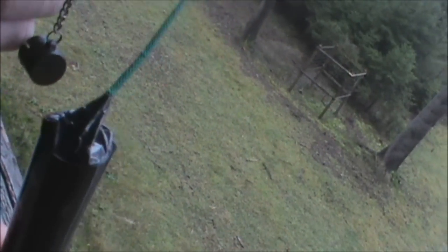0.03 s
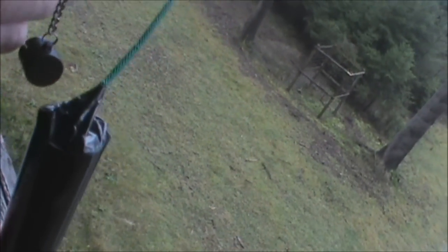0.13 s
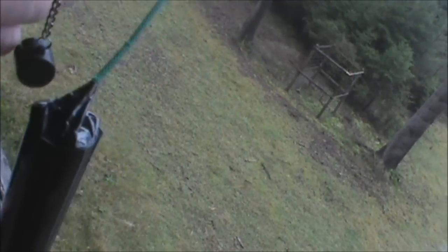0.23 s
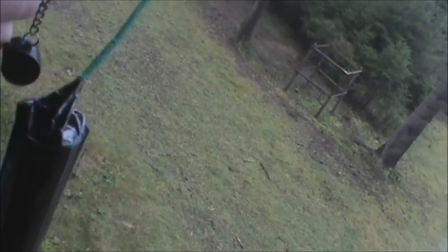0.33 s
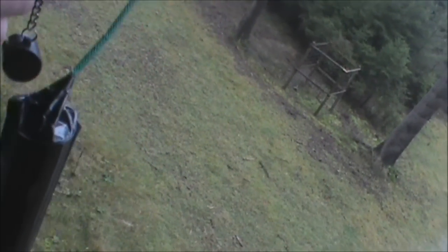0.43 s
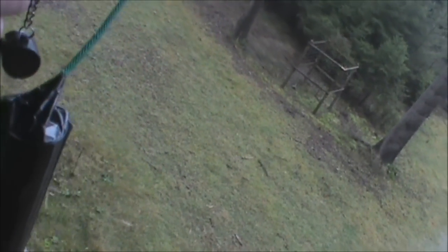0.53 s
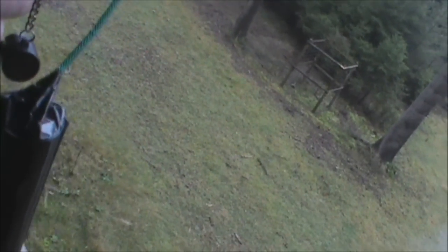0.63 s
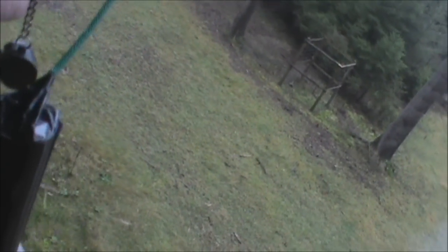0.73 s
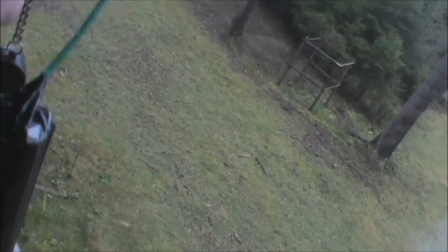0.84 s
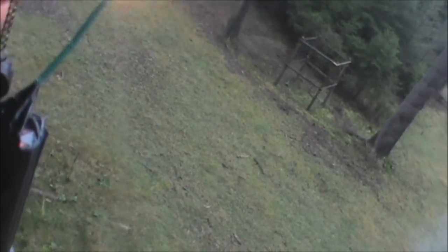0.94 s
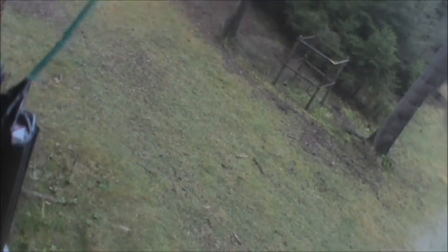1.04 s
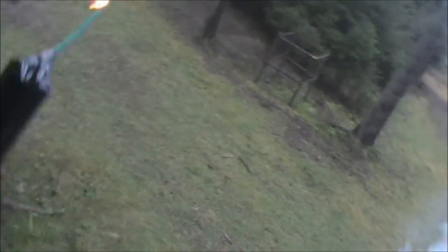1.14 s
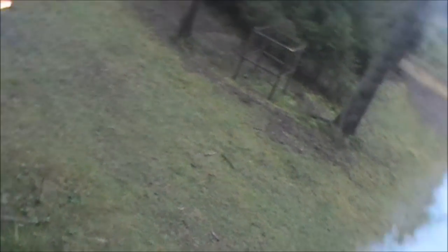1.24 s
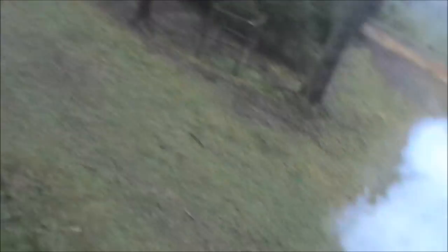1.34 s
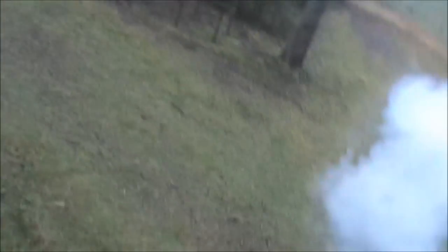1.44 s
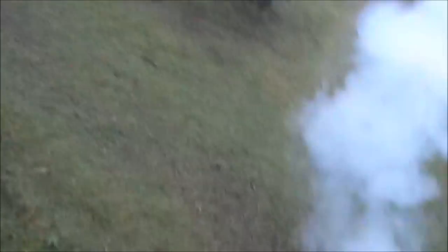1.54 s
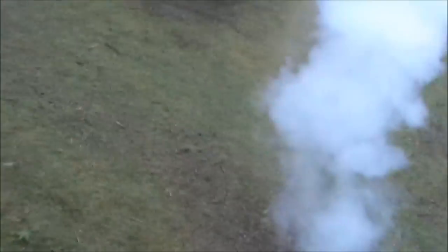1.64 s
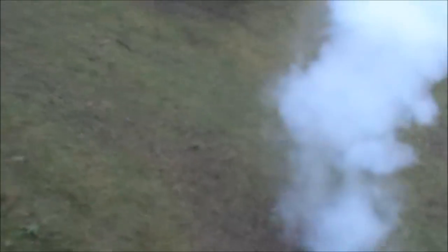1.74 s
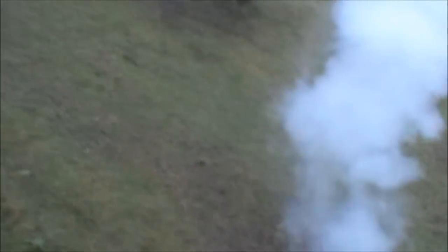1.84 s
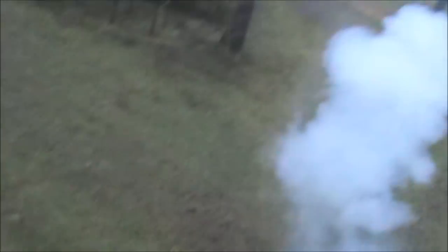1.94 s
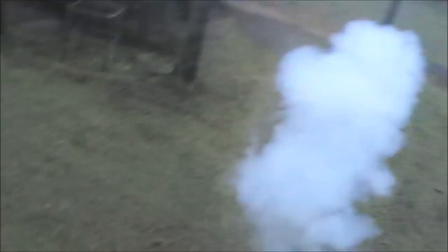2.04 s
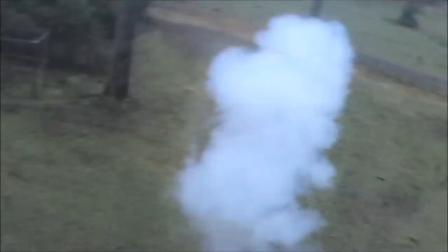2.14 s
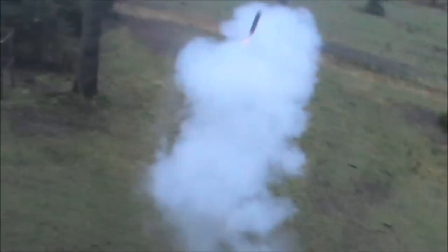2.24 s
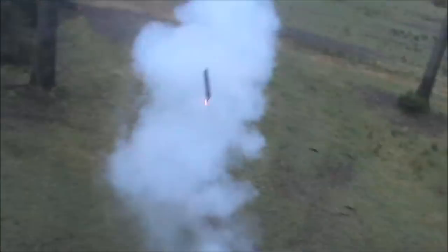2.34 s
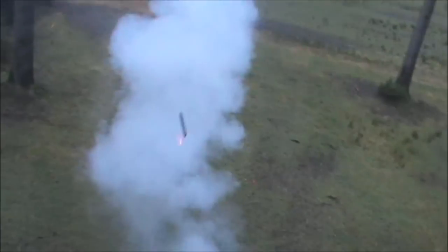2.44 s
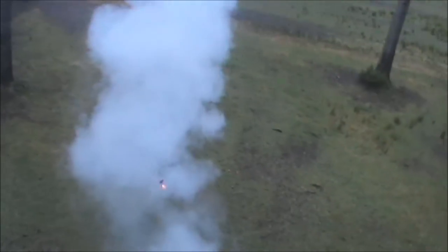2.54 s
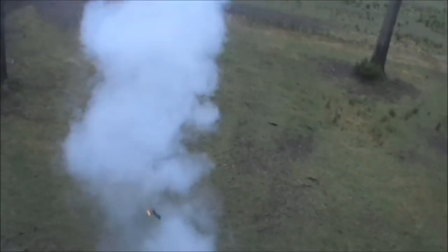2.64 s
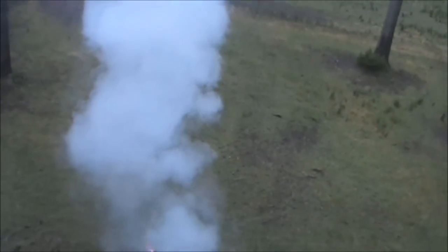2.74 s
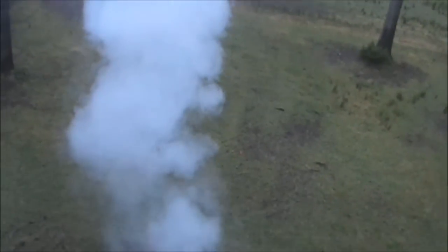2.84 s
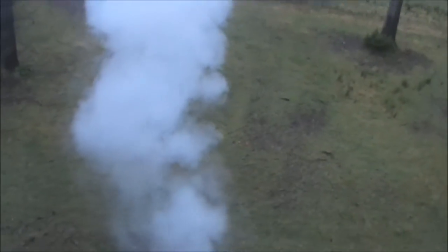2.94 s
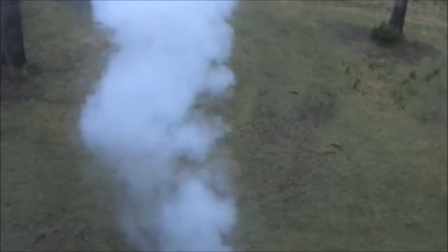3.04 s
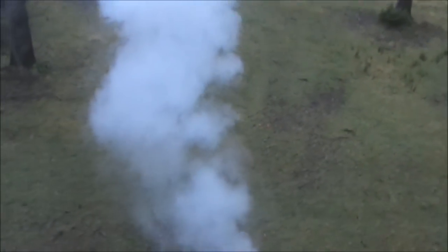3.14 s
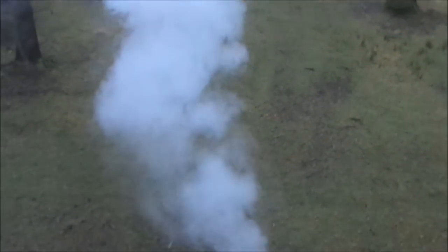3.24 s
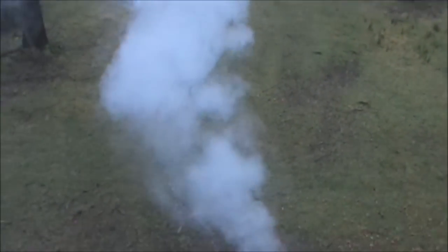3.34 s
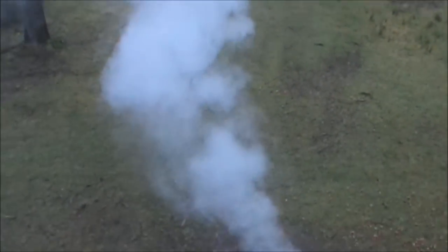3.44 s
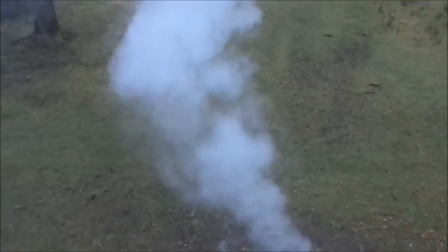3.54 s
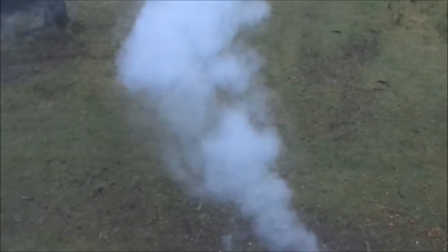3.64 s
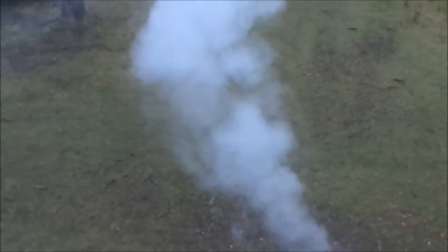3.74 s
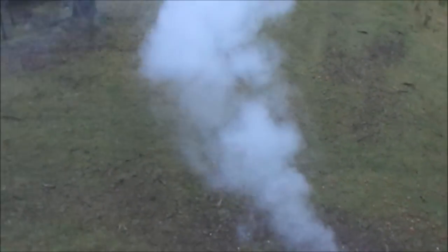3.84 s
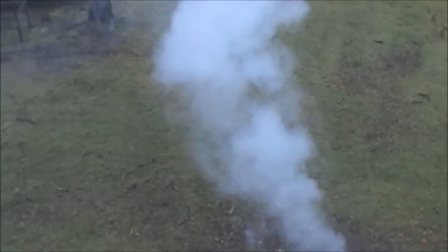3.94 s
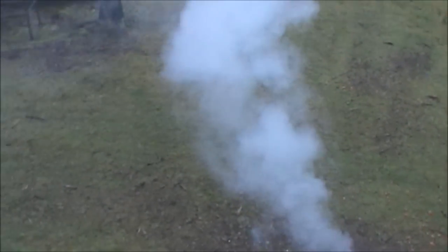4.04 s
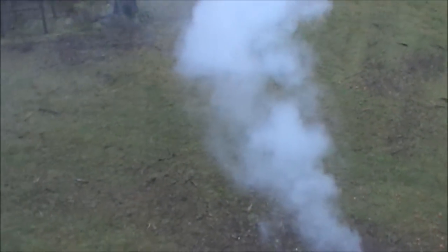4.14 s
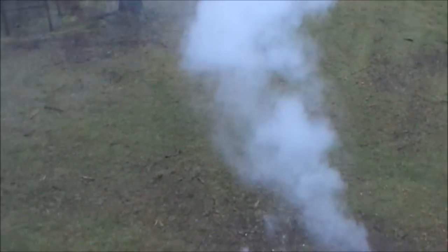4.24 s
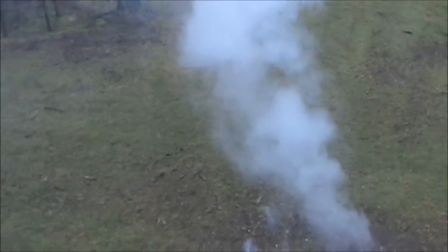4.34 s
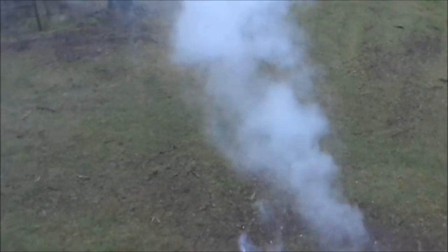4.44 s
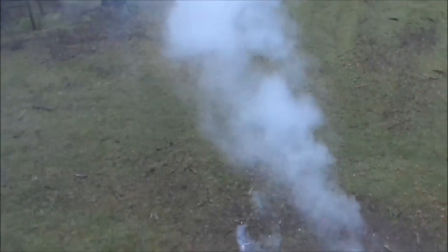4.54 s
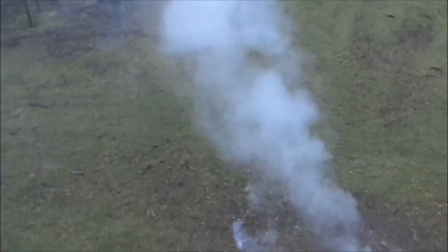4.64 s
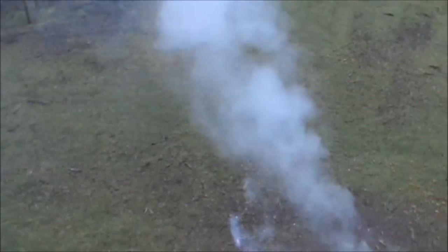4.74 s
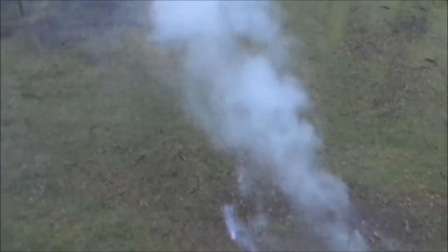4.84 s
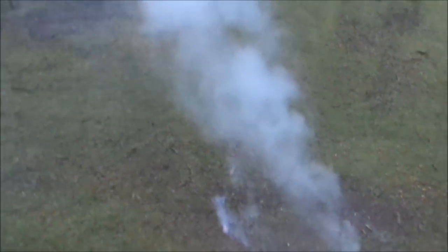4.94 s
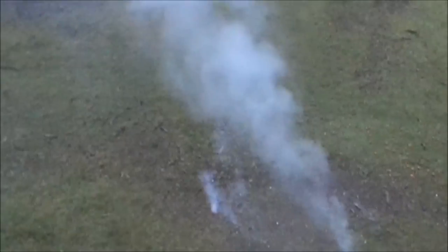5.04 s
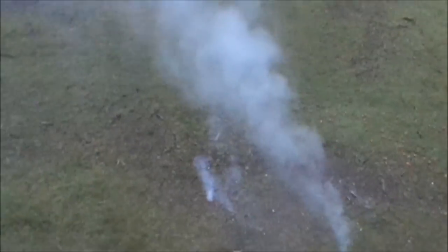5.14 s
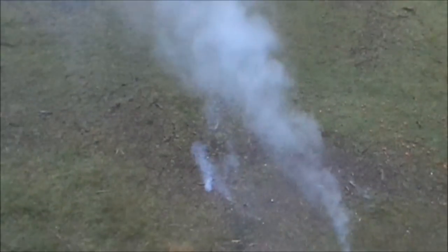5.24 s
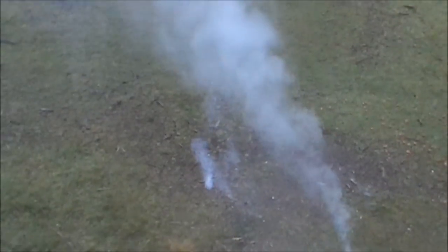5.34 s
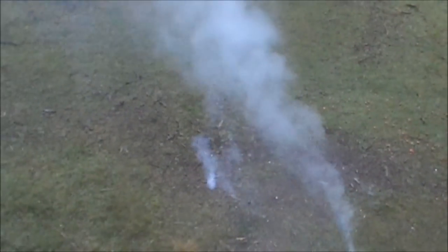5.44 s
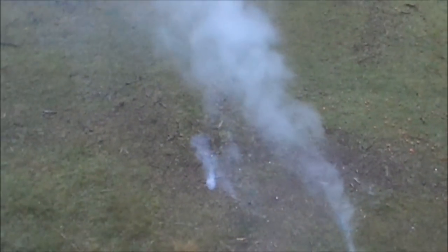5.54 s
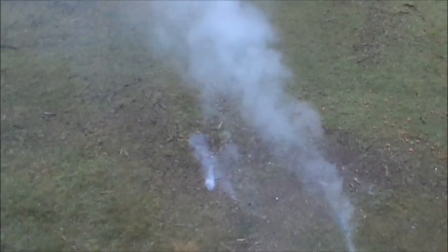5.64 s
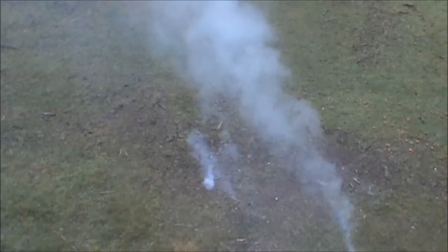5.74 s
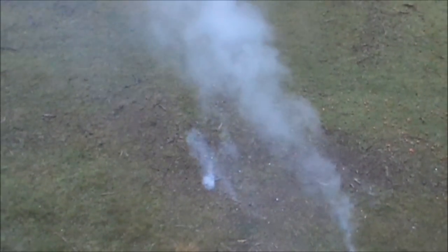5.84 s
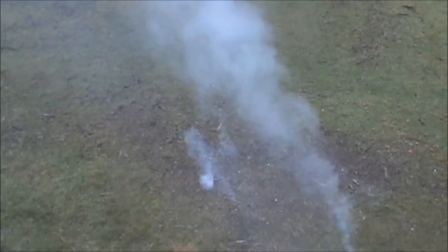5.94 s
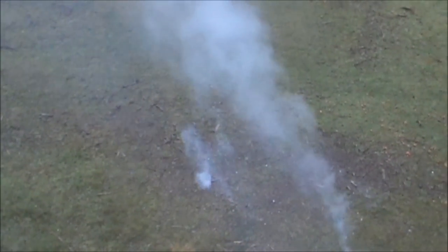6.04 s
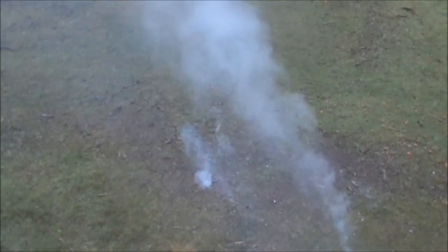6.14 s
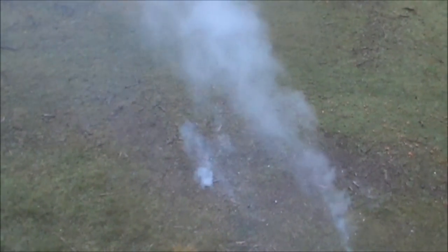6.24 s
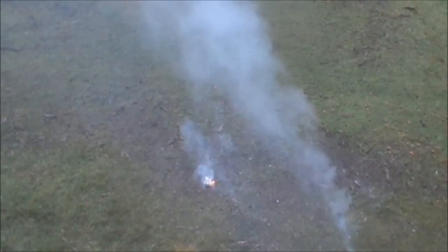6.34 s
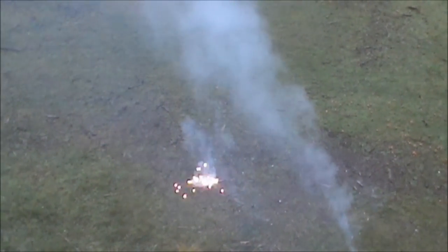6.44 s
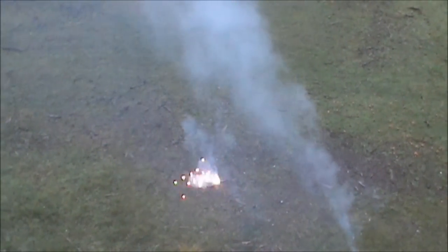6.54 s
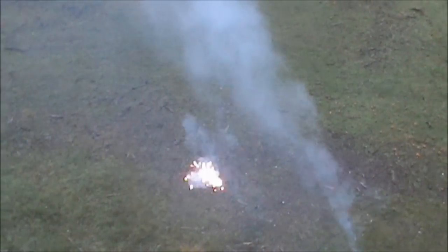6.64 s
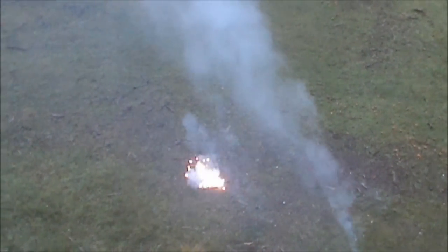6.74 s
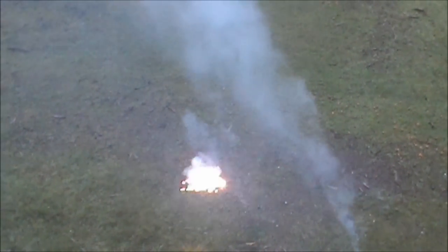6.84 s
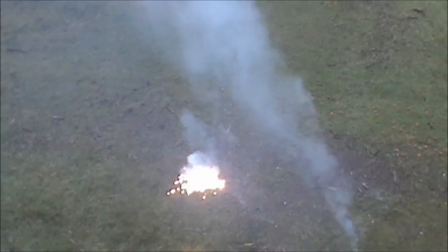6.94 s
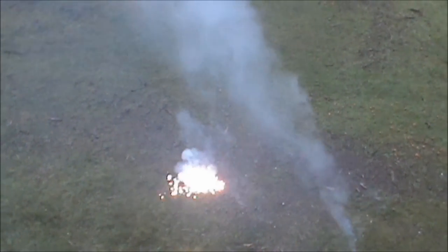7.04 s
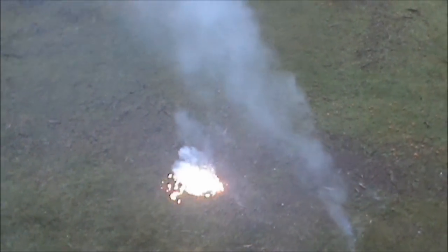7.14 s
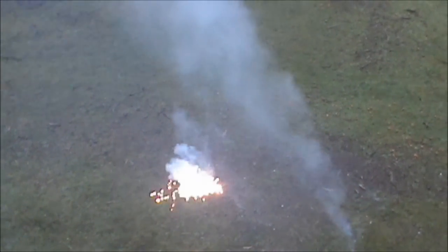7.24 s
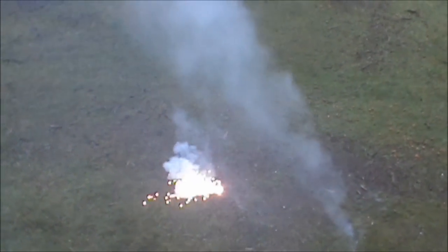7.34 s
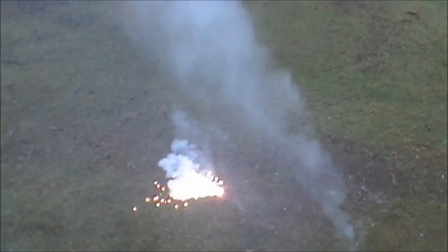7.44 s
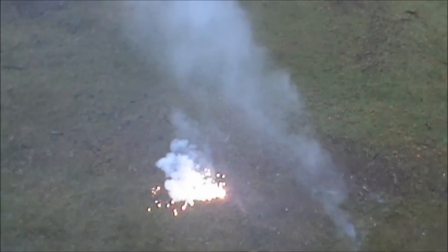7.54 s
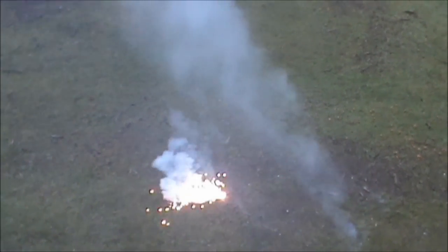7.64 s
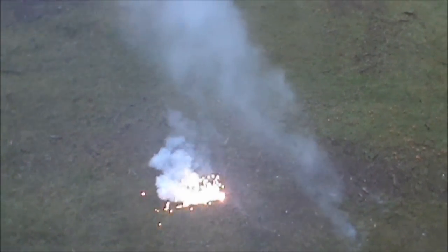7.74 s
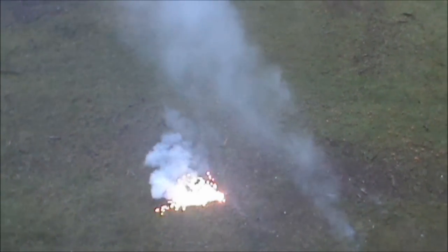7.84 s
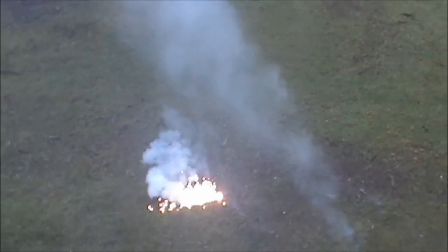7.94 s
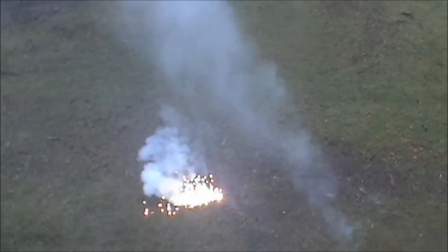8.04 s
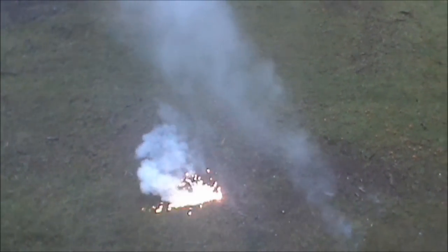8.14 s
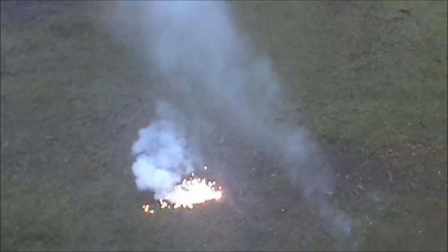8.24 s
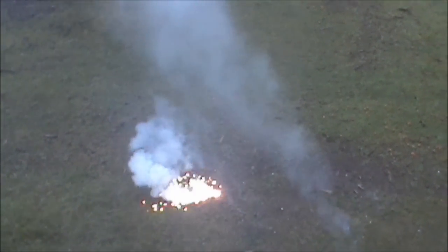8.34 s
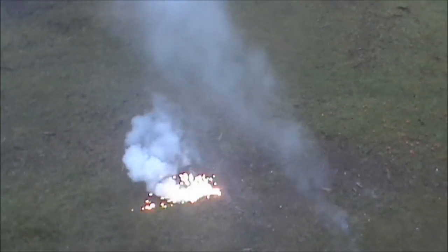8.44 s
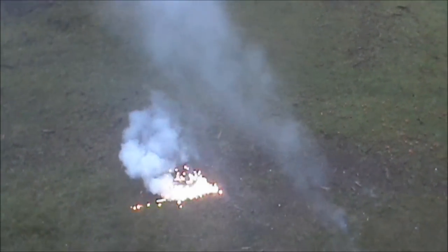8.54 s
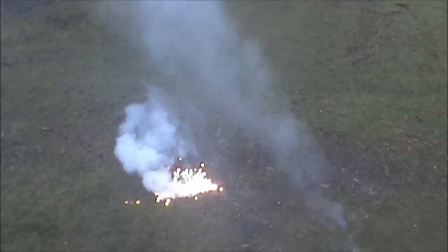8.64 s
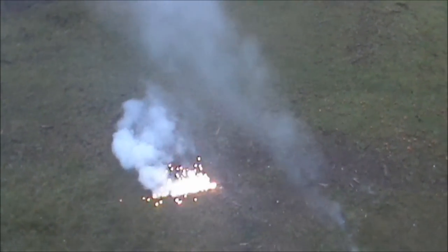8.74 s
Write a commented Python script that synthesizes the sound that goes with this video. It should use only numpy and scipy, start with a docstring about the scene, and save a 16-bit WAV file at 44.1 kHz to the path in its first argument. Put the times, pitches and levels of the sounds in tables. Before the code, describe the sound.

Handheld stereo microphone in a still garden: low torch flutter nearby, then a bright crackly fuse hiss swinging past and flying away. A card tube knocks on the grass and lies weakly fizzing, with small ticks and dull hand bumps. Suddenly gas hisses hard, its airy resonance sliding downward, and locks into a piercing jittery whistle that keeps sinking to the end.

```python
"""On a garden lawn a gas torch, shaped noise with a low roar, lights the fuse of a large firecracker.
The fuse is a sputtering hiss, swept by its ground echo as it is thrown; the tube knocks down and lies fizzing.
Then the charge catches: a rushing jet of noise excites a sinking tube resonance,
which gives way to a loud, falling whistle built from jittery harmonics, with a rasp below and above its pitch.
Soft handling bumps and still outdoor air lie underneath."""
import sys
import numpy as np
from scipy import signal
from scipy.fft import rfft, irfft
from scipy.io import wavfile
from scipy.ndimage import uniform_filter1d

SR = 44100
rng = np.random.default_rng(int(sys.argv[2]) if len(sys.argv) > 2 else 0)


def unload_audio(sound):
    """Save the sound as a 16-bit wav file, at the path given as the first command line argument."""
    columns = np.transpose(np.atleast_2d(sound))
    # keep every value between -1 and 1, then stretch to whole-number steps
    steps = np.round(np.clip(columns, -1, 1) * 32767)
    wavfile.write(sys.argv[1], SR, steps.astype(np.int16))


N = 387198
TIME = np.arange(N) / SR
# time and frequency grid of the moving spectra: 512-sample frames, 128 apart
FRAME_S = np.arange(N // 128 + 5)[:, None] * 128 / SR
BIN_HZ = np.fft.rfftfreq(512, 1 / SR)
LEFT_RIGHT = np.array([[.5], [-.5]])  # splits a difference evenly between the two ports

# the throw: the tube leaves the hand and lands
THROW_S, LAND_S = 1.74, 3.17
# the charge flashes, smoulders, swells to a rush, then sags until the whistle locks
CATCH_S, FLASH_END_S, SWELL_S, SAG_S, LOCK_S = 6.34, 6.455, (6.72, 6.894), 7.344, 7.6


def amp(db):
    """Decibels to gain."""
    return 10 ** (np.asarray(db) / 20)


def evened(x):
    """Scales to rms 1."""
    return x / np.sqrt(np.mean(x ** 2) + 1e-20)


def read(points, hz):
    """Reads a spectrum on a log-frequency axis."""
    f, value = np.transpose(points)
    return np.interp(np.log(hz + 1), np.log(f + 1), value)


def follow(rows, t):
    """Reads every column of a curve at the times t."""
    s, *columns = np.transpose(rows)
    return [np.interp(t, s, c) for c in columns]


def ramp(x, start, end):
    """Goes from 0 at start to 1 at end, in either direction."""
    return np.clip((x - start) / (end - start), 0, 1)


def since(t, start):
    """Seconds gone by since start, 0 before it."""
    return np.maximum(t - start, 0)


def blend(a, b, share):
    """Goes from a to b as share goes from 0 to 1."""
    return a + (b - a) * share


def add(mix, s, sound):
    """Mixes a sound in at time s."""
    part = mix[max(round(s * SR), 0):][:len(sound)]
    part += sound[:len(part)]


def colour(x, gain):
    """Filters by a gain given as a function of Hz."""
    return irfft(rfft(x) * gain(np.fft.rfftfreq(x.shape[-1], 1 / SR)), x.shape[-1])


def wander(rate_hz):
    """Random motion of rms 1, up to about the given rate."""
    return evened(colour(rng.standard_normal(N), lambda f: 1 / (1 + (f / rate_hz) ** 2)))


# how alike the noise is at the two ports: (frequency [Hz], likeness [0-1])
LIKENESS = [(40, 0.99), (150, 0.98), (1500, 0.93), (4000, 0.99), (7000, 0.97), (14000, 1)]


def noise_pair():
    """White noise at the two ports, partly alike."""
    left, other = rng.standard_normal((2, N))
    same = lambda f: np.clip(read(LIKENESS, f), 0, 1)
    shared = colour(left, same)
    own = colour(other, lambda f: np.sqrt(1 - same(f) ** 2))
    return np.array([left, shared + own])


def resonate(x, hz, width):
    """A resonance of gain 1 that follows the curve hz: shift down to zero, smooth, shift back."""
    turn = np.exp(2j * np.pi * np.cumsum(hz) / SR)
    r = np.exp(-np.pi * width / SR)
    return 2 * (turn * signal.lfilter([1 - r], [1, -r], x / turn)).real


def resonant_noise(noise, hz, width):
    """Two equal resonances in a row leave a band of noise, scaled to rms 1."""
    return evened(resonate(resonate(noise, hz, width), hz, width))


def flame(shape, bright_db, patchy_db, spread=0):
    """Turbulent hiss with a moving spectrum, scaled by its body band and tipped to the given brightness."""
    def band_gain(lo, hi):
        """Strength of one band in every frame."""
        inside = (BIN_HZ > lo) & (BIN_HZ < hi)
        return np.sqrt((shape[:, inside] ** 2).sum(1, keepdims=True) / len(BIN_HZ))
    body, treble = band_gain(500, 3800), band_gain(7000, 15000)
    tilt = (amp(bright_db) * body / treble) ** ramp(BIN_HZ, 3770, 8340)
    gain = shape / body * tilt
    # noise in opposite phase at the two ports, stronger in the treble
    apart = LEFT_RIGHT * colour(rng.standard_normal(N), lambda f: 0.38 + ramp(f, 5000, 11300))
    z = signal.stft(noise_pair() + spread * apart, nperseg=512, noverlap=384)[2]
    # random patches over time and frequency
    patches = uniform_filter1d(rng.standard_normal(gain.shape), size=18, axis=0)
    patches = evened(uniform_filter1d(patches, size=16, axis=1))
    gain = (gain * amp(patchy_db * patches))[:z.shape[-1]].T
    return signal.istft(z * gain, nperseg=512, noverlap=384)[1][:, :N]


# the flame stumbles and the whistle dips: (time [s], pitch drop [Hz], level drop [dB])
STUMBLES = [(7.887, 168, 1), (8.102, 327, 4), (8.427, 199, 3.5), (8.547, 277, 1.5)]
# the whistle sinks as the tube empties, faster at the end; each stumble kicks it up a little
WHISTLE_START_HZ, SINK_HZ_PER_S, DROOP_S, DROOP_HZ_PER_S = 4690, 472, 8.65, 750
KICK_HZ, KICK_FADE_S = 52, 1.1


def whistle_pitch():
    """The pitch sinks steadily; each stumble lifts it a little and the lift dies away."""
    kicks = sum((TIME > s) * np.exp(-since(TIME, s) / KICK_FADE_S) for s, _, _ in STUMBLES)
    sunk_hz = SINK_HZ_PER_S * since(TIME, LOCK_S) + DROOP_HZ_PER_S * since(TIME, DROOP_S)
    return WHISTLE_START_HZ - sunk_hz + KICK_HZ * kicks


# whistle before gain control: (time [s], level [dB], left over right [dB])
WHISTLE = [(7.6, -16.5, 12), (7.66, -18, 11.5), (7.76, -12.5, 4.5), (8.1, -5, 1.5), (8.4, -5, 2.5),
           (8.75, 0.5, 0.5)]
# fundamental and two overtones, relative to the whistle: (level [dB])
OVERTONES_DB = [-1, -17, -43]
# rush of gas under the whistle: (frequency [Hz], relative level [dB])
RUSH_COLOUR = [(100, -30), (300, -8.5), (1400, -6), (2300, 0.5), (3000, -3.5), (4000, 0.5), (5100, -2),
               (5700, -16), (6600, -11), (7500, -12.5), (9000, -9), (11000, -5.5), (13000, -15),
               (15500, -28)]


def whistle(drift_hz=15, waver_hz=12, grow_s=.2, jitter_hz=17, shimmer_db=0.9, stumble_s=0.00298, rush_db=-30):
    """Burning oscillates near the tube's pitch: a jittery tone that dips at each stumble."""
    level_db, pan_db = follow(WHISTLE, TIME)
    # fast jitter and shimmer start three times as deep and settle
    unsettled = 1 + 2.0 * np.exp(-since(TIME, LOCK_S) / 0.087)
    hz = whistle_pitch() + drift_hz * wander(42.2) + waver_hz * wander(12)
    hz = hz + jitter_hz * unsettled * wander(466)
    level_db = level_db + shimmer_db * unsettled * wander(160)
    for s, drop_hz, drop_db in STUMBLES:
        dip = np.exp(-((TIME - s) / stumble_s) ** 2)
        hz = hz - drop_hz * dip
        level_db = level_db - drop_db * dip
    phase = 2 * np.pi * np.cumsum(hz) / SR
    grown = blend(.3, 1, ramp(TIME, LOCK_S, LOCK_S + grow_s))  # the overtones grow in with the oscillation
    harmonics = sum(amp(db) * grown ** k * np.sin((k + 1) * phase) for k, db in enumerate(OVERTONES_DB))
    tone = np.sqrt(2) * harmonics * amp(level_db + LEFT_RIGHT * pan_db)
    rush = evened(colour(noise_pair(), lambda f: amp(read(RUSH_COLOUR, f))))
    rush = rush * amp(rush_db + 1.5 * wander(70))
    return tone * ramp(TIME, 7.59, 7.62) + rush * ramp(TIME, 7.3, 7.67)


def rasp(lower_db=-33, upper_db=-35, width_hz=650):
    """Alternating whistle cycles, voiced as growing fuzzy bands at half and one and a half times the pitch."""
    hz, drive = whistle_pitch(), noise_pair()
    lower = amp(lower_db) * resonant_noise(drive, hz / 2, width_hz)
    upper = amp(upper_db) * resonant_noise(drive, hz + hz / 2, width_hz)
    return (lower + upper) * ramp(TIME, LOCK_S, DROOP_S)


# resonance of the tube, sinking steadily as the charge burns down into it
TUBE_HZ, TUBE_SINK_HZ_PER_S, TUBE_EMPTY_HZ, TUBE_DB, TUBE_SWELL_DB = 6090, 2330, 4580, -17.5, 41


def tube(wide_hz=1900, narrow_hz=450, slack_db=3.5, ring=0.46, slack_ring=.12, gather_s=7.47,
         under_whistle_db=-35, lock_s=0.066):
    """The jet blows across the emptying tube; its resonance is strongest at the swell and before the whistle."""
    hz = np.maximum(TUBE_HZ - TUBE_SINK_HZ_PER_S * since(TIME, SWELL_S[1]), TUBE_EMPTY_HZ)
    slack = np.sin(np.pi * ramp(TIME, SWELL_S[1], gather_s))  # the ring slackens, then gathers again
    level_db = TUBE_DB - TUBE_SWELL_DB * ramp(TIME, SWELL_S[1], FLASH_END_S) ** 1.42 - slack_db * slack
    locked = ramp(TIME, LOCK_S, LOCK_S + lock_s)
    drive = noise_pair()
    wide, narrow = resonant_noise(drive, hz, wide_hz), resonant_noise(drive, hz, narrow_hz)
    # share of the narrow resonance
    sharp = blend(ring * ramp(TIME, *SWELL_S), slack_ring, slack)
    sharp = np.clip(blend(sharp, 0.56, locked), 0, 1)
    level_db = blend(level_db, under_whistle_db, locked)
    return blend(wide, narrow, sharp) * amp(level_db) * ramp(TIME, FLASH_END_S, FLASH_END_S + .1)


# rush of sparks: (frequency [Hz], relative level [dB])
JET_COLOUR = [(60, -33), (140, 0), (190, -13.5), (330, -3.5), (800, -5), (2500, -3.5), (3800, -3.5),
              (4400, -9.5), (8000, -6), (9400, -5), (10700, 0), (13000, -7.5), (15500, -16)]
# body level and treble-over-body brightness at each stage of the burn
FLASH_DB, SMOULDER_DB, RUSH_DB, SAG_DB_PER_S = -25.5, -29.5, -23.5, 13
FLASH_BRIGHT_DB, SMOULDER_BRIGHT_DB, RUSH_BRIGHT_DB, DULLING_DB_PER_S = 7, -2.5, 0, 5


def jet(sputter_db=0.7, attack_s=0.07, attack_db=28, release_s=0.026, drop_db_per_s=170, lead_s=.02):
    """The charge flashes, smoulders and swells to a wide rush of sparks, which drops as the whistle takes hold."""
    def stages(t, flash, smoulder, rush):
        """One value for each stage of the burn, joined in time."""
        burning = blend(smoulder, rush, ramp(t, *SWELL_S))
        return blend(flash, burning, ramp(t, FLASH_END_S, FLASH_END_S + release_s))
    level_db = stages(TIME, FLASH_DB, SMOULDER_DB, RUSH_DB)
    level_db = level_db - attack_db * ramp(TIME, CATCH_S + attack_s, CATCH_S)
    level_db = level_db - SAG_DB_PER_S * since(TIME, SAG_S) - drop_db_per_s * since(TIME, LOCK_S - lead_s)
    bright_db = stages(FRAME_S, FLASH_BRIGHT_DB, SMOULDER_BRIGHT_DB, RUSH_BRIGHT_DB)
    bright_db = bright_db - DULLING_DB_PER_S * since(FRAME_S, SWELL_S[1])
    # the colour shifts from the flash towards the rush
    shift_db = read([(150, -2.5), (700, 2.0), (2500, -0.5), (11000, 13.5), (15000, 6)], BIN_HZ)
    shape = amp(read(JET_COLOUR, BIN_HZ) + shift_db * ramp(FRAME_S, 6.0, 6.78))
    hiss = flame(shape, bright_db, patchy_db=1.5) * ramp(TIME, CATCH_S, CATCH_S + 0.018)
    return hiss * amp(level_db + sputter_db * wander(89.5))


def whump(hz=130, width_hz=70, level_db=-41, length_s=.04):
    """The flash of the charge shoves the air: a soft low puff."""
    puff = resonant_noise(noise_pair(), np.full(N, hz), width_hz)
    return amp(level_db) * puff * np.exp(-((TIME - FLASH_END_S) / length_s) ** 2)


# distance at the throw and steady speed of flight
HAND_M, THROW_M_PER_S = 0.63, 3
# the fuse catches with a flare that fades and is cut short
FLARE_S, FLARE_DB, FLARE_FADE_DB_PER_S, FLARE_TREBLE_DB = (0.9297, 1.135), -21, 23, -20
# body of the fuse's hiss in the hand and on the grass; it thins out for a while
HELD_DB, LYING_DB, THIN_S, THIN_DB = -31.5, -51.5, (5.1, 6.05), 5
# treble of the fuse's hiss in the hand and the air, before the fuse's gain: (time [s], level [dB])
HISS_IN_AIR = [(1.16, -21.5), (1.182, -20), (1.462, -30), (1.754, -20), (1.948, -29.5), (2.064, -26.5),
               (2.824, -34.5), (3.14, -37)]
# treble of the fuse's hiss on the grass, before the fuse's gain: (time [s], level [dB])
HISS_ON_GRASS = [(3.22, -47.5), (3.45, -33.5), (3.6, -40), (4.28, -40.5), (4.34, -51.5), (4.57, -40.5),
                 (4.61, -47), (4.95, -49), (4.99, -42.5), (5.18, -48.5), (5.34, -47), (5.39, -43),
                 (5.85, -44.5), (5.87, -38), (5.96, -48), (6.0, -44), (6.15, -39.5), (6.32, -55)]


def fuse_levels(t, usual_treble_db=-42, coupling=0.38, cut_s=0.016, thin_edge_s=0.17):
    """Body and treble in dB: the body falls with distance in flight and follows the treble on the grass."""
    treble_db, = follow(HISS_IN_AIR + HISS_ON_GRASS, t)
    flying_db = HELD_DB - 20 * np.log10(1 + THROW_M_PER_S * since(t, THROW_S) / HAND_M)
    thin = ramp(t, THIN_S[0], THIN_S[0] + thin_edge_s) * ramp(t, THIN_S[1], THIN_S[1] - thin_edge_s)
    lying_db = LYING_DB + coupling * (treble_db - usual_treble_db) - THIN_DB * thin
    body_db = np.where(t < LAND_S, flying_db, lying_db)
    flaring = ramp(t, FLARE_S[1], FLARE_S[1] - cut_s)
    flare_db = FLARE_DB - FLARE_FADE_DB_PER_S * since(t, FLARE_S[0])
    return blend(body_db, flare_db, flaring), blend(treble_db, FLARE_TREBLE_DB, flaring)


# echo off the lawn: its delay shrinks as the tube falls; strength 0-1
ECHO_FALL_MS_PER_S, ECHO_LANDING_MS, ECHO_IN_AIR = 0.694, 0.16, .34
# the tube shifts in the grass and its echo changes: (time [s], delay [ms], strength [-1 to 1])
SHIFTS = [(3.2, 0.2, -.25), (3.97, 0.27, -0.45), (4.42, 0.11, 0.6)]


def ground_comb(t, shift_s=.13):
    """Gain by time and frequency of the hiss plus its echo off the lawn."""
    def comb(ms, strength):
        """Ripples left by one echo."""
        return abs(1 + np.clip(strength, -.9, .9) * np.exp(-2j * np.pi * BIN_HZ * ms / 1000))
    falling_ms = ECHO_LANDING_MS + ECHO_FALL_MS_PER_S * since(LAND_S, t)
    gain = comb(falling_ms, ECHO_IN_AIR * ramp(t, 2.2, 2.55))
    for s, delay_ms, strength in SHIFTS:
        gain = blend(gain, comb(delay_ms, strength), ramp(t, s, s + shift_s))
    return gain


# hiss of the fuse: (frequency [Hz], relative level [dB])
FUSE_COLOUR = [(700, -9.5), (2100, -5), (4300, -4), (7000, -1), (11000, 2.5), (13000, -2), (15500, -4.5)]


def fuse(gain_db=-0.2, sputter_db=0.94, flicker_db=1.06, attack_s=0.017, gap_s=1.139, gap_db=5.5,
         pass_s=1.41, pass_length_s=0.23, pass_left_db=2):
    """The fuse flares, chokes for a moment and burns on; the ground echo combs its hiss."""
    level_db, _ = fuse_levels(TIME)
    body_db, treble_db = fuse_levels(FRAME_S)
    shape = amp(read(FUSE_COLOUR, BIN_HZ)) * ramp(BIN_HZ, 60, 470) * ground_comb(FRAME_S)
    choke_db = gap_db * np.exp(-((TIME - gap_s) / 0.0087) ** 2)
    alight = ramp(TIME, FLARE_S[0], FLARE_S[0] + attack_s) * (1 - ramp(TIME, CATCH_S, CATCH_S + .04))
    unsteady_db = sputter_db * wander(60) + flicker_db * wander(15) * ramp(TIME, THROW_S, LAND_S)
    # swung close past the camera, the fuse reaches the two ports differently
    passing = np.exp(-((TIME - pass_s) / pass_length_s) ** 2)
    spread = blend(0.31, 0.083, ramp(TIME, THROW_S, 3.5)) + 1.8 * passing
    pan_db = LEFT_RIGHT * pass_left_db * passing
    hiss = flame(shape, treble_db - body_db, patchy_db=1.83, spread=spread)
    return hiss * alight * amp(level_db + gain_db - choke_db + unsteady_db + pan_db)


def spit(at_s=.717, length_s=0.0073, level_db=-22):
    """The fuse spits once before it catches: a short bright puff."""
    bright = [(1500, -19), (5000, -10), (11500, -2), (15500, -8)]  # (frequency [Hz], relative level [dB])
    puff = evened(colour(noise_pair(), lambda f: amp(read(bright, f))))
    return amp(level_db) * puff * np.exp(-((TIME - at_s) / length_s) ** 2)


# the tube lands and bounces and a few bits snap, before the knocks' gains:
# (time [s], crack level [dB], thud over crack [dB], treble lift [dB], crack fall by 60 dB [s])
KNOCKS = [(3.099, -31, -8, -12, 0.032), (3.172, -22, -11, -2, 0.011), (3.174, -8, -5.5, 5.5, 0.01),
          (3.193, -14.5, 1.5, 0.5, 0.007), (3.226, -33, -12, -12, .02), (3.765, -29, -17, 0, 0.034),
          (3.976, -16.5, -28, -0.5, 0.017), (5.393, -28.5, -22, -9, 0.027)]
# crack of a knock: (frequency [Hz], relative level [dB])
KNOCK_COLOUR = [(300, -24), (900, 5), (2000, 0.5), (5000, -4), (7500, -9.5), (10000, 1.5), (15000, -14)]
# card tube on turf: (frequency [Hz], relative level [dB], fall by 60 dB [s])
THUD = [(376, 6, 0.023), (557, 2, 0.036), (1580, -5, 0.027)]


def knocks(gain_db=-3, thud_db=-12):
    """Each knock is a short crack plus the dull ring of the tube."""
    out, t = np.zeros(N), np.arange(4096) / SR
    ring = sum(amp(db - 60 * t / t60) * np.sin(2 * np.pi * hz * t) for hz, db, t60 in THUD)
    for s, crack_db, low_db, treble_db, t60 in KNOCKS:
        tint = lambda f: amp(read(KNOCK_COLOUR, f) + treble_db * ramp(f, 4000, 9000))
        crack = evened(colour(rng.standard_normal(len(t)), tint)) * amp(-60 * t / t60)
        add(out, s, amp(crack_db + gain_db) * (crack + amp(low_db + thud_db) * ring))
    return out


# low roar and gas hiss of the torch: (frequency [Hz], relative level [dB])
TORCH_COLOUR = [(30, -36), (85, -27.5), (135, -5), (180, 0), (340, -7), (430, -13.5), (750, -17),
                (2200, -21), (6400, -27.5), (9500, -34), (12600, -25.5), (16000, -31)]
# gas torch: steady at the fuse, turned aside, then fading as it is drawn away
TORCH_DB, TORCH_TURN_S, TORCH_TURN_DB = -31, (1, 1.06), 5.5
TORCH_LEAVES_S, TORCH_FADE_DB_PER_S, TORCH_FAR_DB = 1.86, 4.5, -65


def torch(flutter_db=0.25):
    """A low flame roar and a gas hiss from shaped noise; the colour shifts once the nozzle turns away."""
    level_db = TORCH_DB - TORCH_TURN_DB * ramp(TIME, *TORCH_TURN_S)
    level_db = level_db - TORCH_FADE_DB_PER_S * since(TIME, TORCH_LEAVES_S)
    level_db = np.maximum(level_db, TORCH_FAR_DB)
    gas = colour(noise_pair(), lambda f: amp(read(TORCH_COLOUR, f)))
    gas = gas / np.std(colour(gas, lambda f: (f > 130) & (f < 400)))  # the roar band sets the level
    # away from the fuse the roar thins out and sits higher: (frequency [Hz], change [dB])
    away_db = [(60, 12.0), (150, -3.5), (260, 2.0), (500, 1.0), (1200, -3.5), (4500, -8), (12000, 6)]
    away = colour(gas, lambda f: amp(read(away_db, f)))
    turned = ramp(TIME, 1.0, 1.596)
    return blend(gas, away, turned) * amp(level_db + flutter_db * wander(60))


# the hand shifts on the camera, before the bumps' gain:
# (time [s], level [dB], pitch [Hz], length [s])
BUMPS = [(1.301, -35.5, 90, 0.13), (2.043, -38, 75, 0.054), (3.05, -39, 70, 0.093),
         (3.829, -29.5, 242, 0.055), (3.892, -36, 60, 0.043), (4.238, -28, 177, 0.034),
         (4.313, -28.5, 76, 0.059), (4.39, -36.5, 60, 0.05)]


def bumps(gain_db=-4, apart=0.11):
    """Soft low pushes through the camera body, nearly alike at the two ports."""
    out = np.zeros((2, N))
    for s, level_db, pitch_hz, length in BUMPS:
        low_band = lambda f: (f / pitch_hz) ** 2 / (1 + (f / pitch_hz) ** 5)
        both, own = evened(colour(rng.standard_normal((2, 8192)), low_band))
        t = (np.arange(len(both)) - len(both) / 2) / SR
        swell = amp(level_db + gain_db) * np.exp(-(2 * t / length) ** 2)
        for port, side in zip(out, (1, -1)):
            add(port, s + t[0], (both + side * apart * own) * swell)
    return out


# still outdoor air: (frequency [Hz], relative level [dB])
AIR = [(20, -7.5), (250, -5.5), (900, -23.5), (2500, -12.5), (4700, -19), (12000, -20)]


def still_air(level_db=-53):
    """Steady outdoor air: faint shaped noise."""
    return amp(level_db) * evened(colour(noise_pair(), lambda f: amp(read(AIR, f))))


# surfaces round the camera: (delay [ms], gain)
NEAR_ECHOES = [(.78, 0.025), (.88, -.07), (1.4, -0.064), (1.9, 0.052), (2.25, -0.0075), (9.15, 0.15)]


def nearby(x):
    """Close reflections cut fixed ripples into the spectrum."""
    def ripples(f):
        """Direct sound plus every delayed copy."""
        return 1 + sum(g * np.exp(-2j * np.pi * f * ms / 1000) for ms, g in NEAR_ECHOES)
    return colour(x, ripples)


def garden(x, wet_db=-21, t60=0.28):
    """Faint scattered echoes from the house wall and the trees."""
    t = np.arange(SR // 2) / SR
    struck = rng.random((2, len(t))) < 1500 / SR  # about 1500 echoes a second
    taps = rng.standard_normal((2, len(t))) * struck * amp(-60 * t / t60) * (t > .008)
    echoes = signal.fftconvolve(x, taps / np.linalg.norm(taps[0]), axes=1)[:, :N]
    return x + amp(wet_db) * echoes


# phase between the two microphone ports: (frequency [Hz], left lead [rad])
PORT_PHASE = [(30, -0.059), (130, -0.27), (550, -0.7), (1100, -0.64), (1800, -0.27), (3500, -0.17),
              (4400, 0.45), (6000, 0.01)]


def ports(x):
    """The two ports hear each band slightly out of step."""
    return colour(x, lambda f: np.exp(1j * LEFT_RIGHT * read(PORT_PHASE, f)))


def scene():
    """The torch and the hand are near; the firecracker is out in the garden."""
    burning = nearby(spit() + fuse() + knocks() + jet() + whump() + tube())
    firecracker = garden(burning + whistle() + rasp())
    return ports(torch() + firecracker + still_air()) + bumps()


def record(dry, threshold_db=-12.0, share=0.89, edge_hz=15900):
    """Gain control holds the whistle level and ducks everything under it; then the band limit."""
    power = uniform_filter1d((dry ** 2).mean(0), size=2600)
    power_db = 10 * np.log10(abs(power) + 1e-12)
    held = dry * amp(-share * np.maximum(power_db - threshold_db, 0))
    low_pass = signal.firwin(511, edge_hz, window=("kaiser", 9), fs=SR)
    return signal.oaconvolve(held, low_pass[None], "same")


dry = scene()
out = record(dry)
unload_audio(out)
```